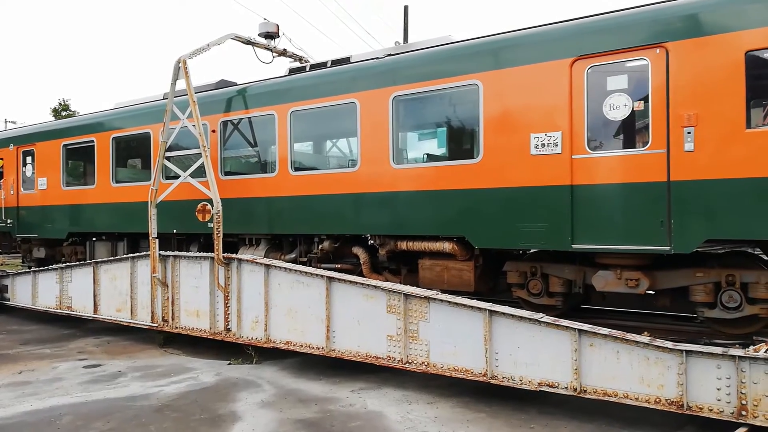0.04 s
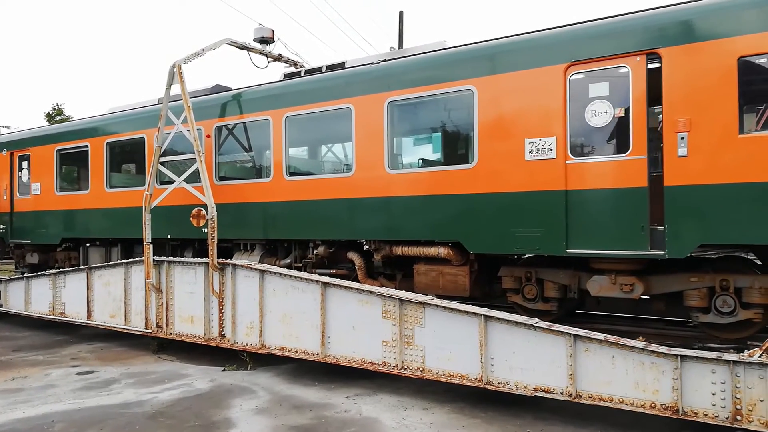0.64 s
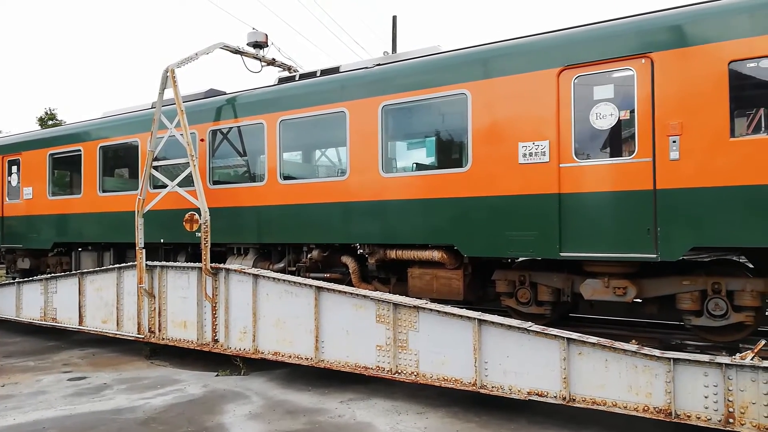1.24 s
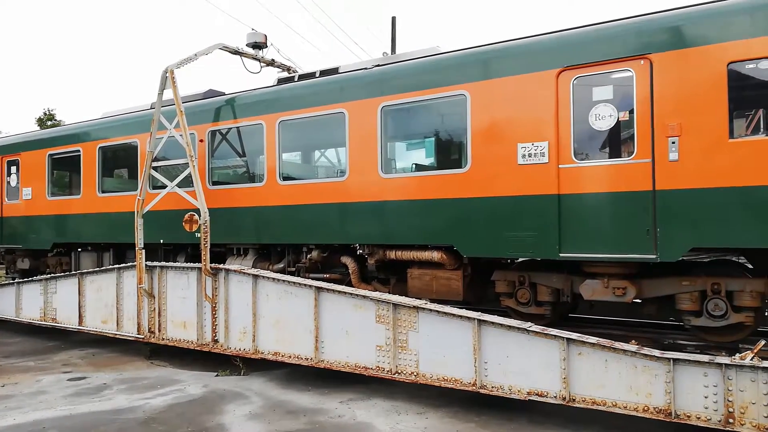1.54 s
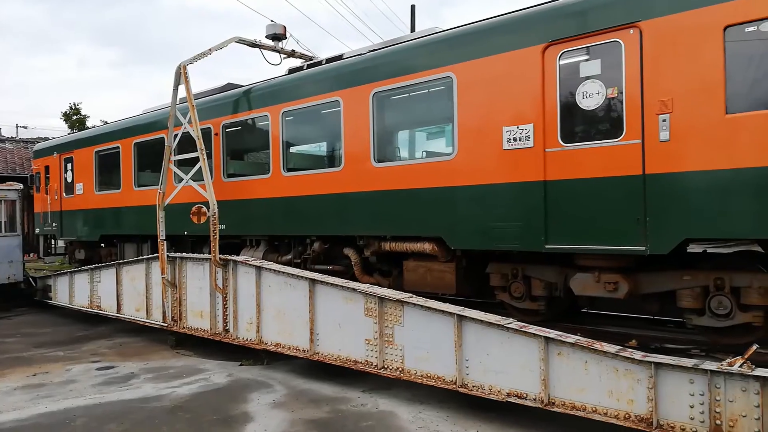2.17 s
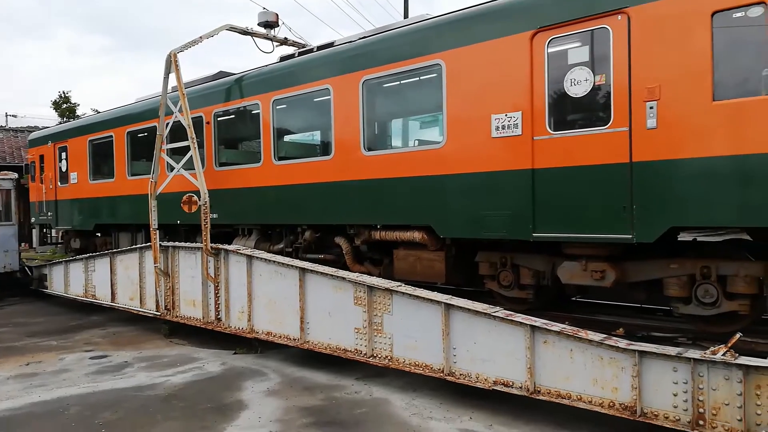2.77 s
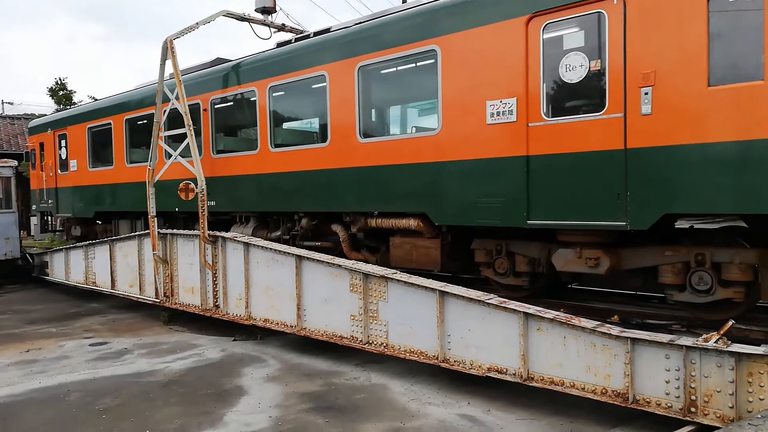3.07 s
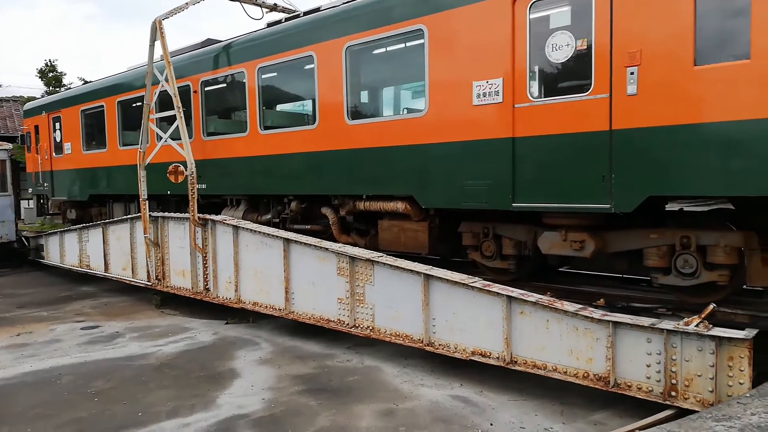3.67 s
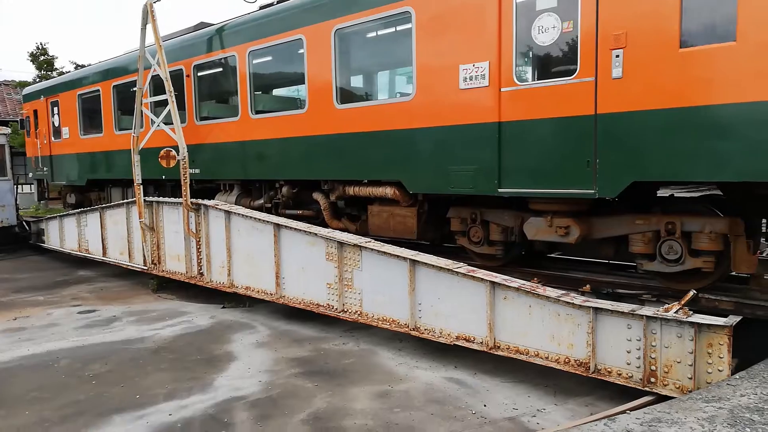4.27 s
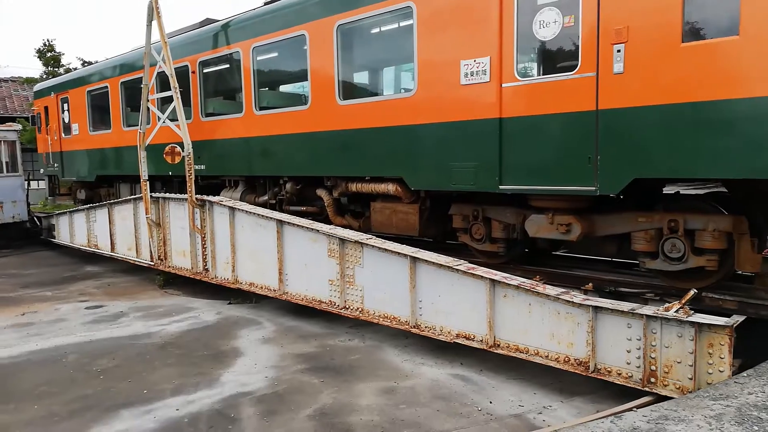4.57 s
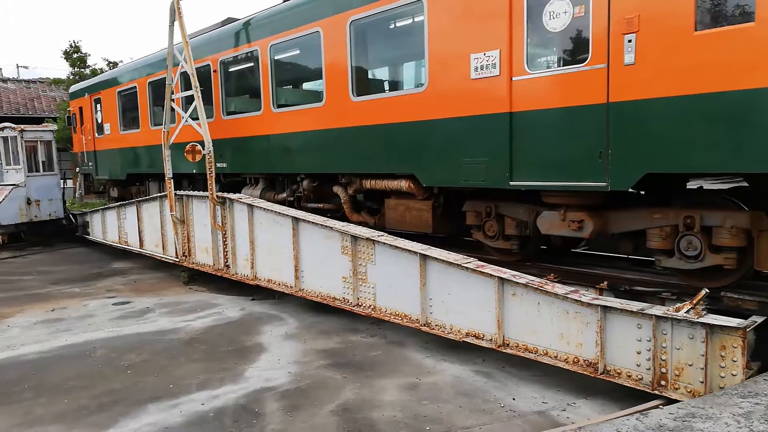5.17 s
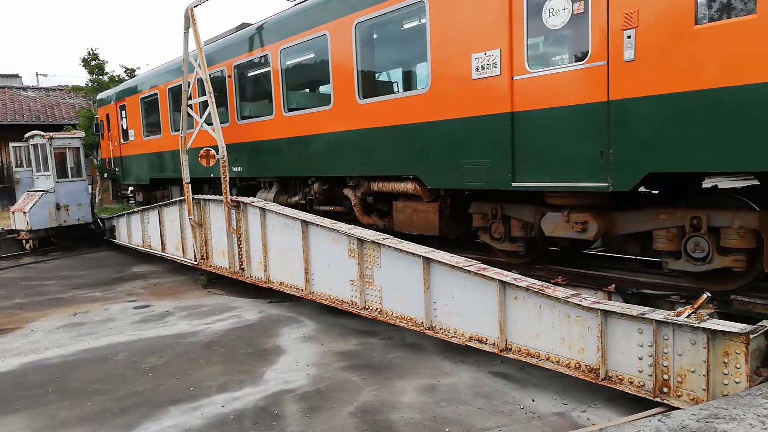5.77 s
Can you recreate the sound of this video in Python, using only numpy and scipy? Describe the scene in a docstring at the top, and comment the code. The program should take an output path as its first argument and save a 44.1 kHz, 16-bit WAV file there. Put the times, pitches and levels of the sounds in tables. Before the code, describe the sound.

A diesel railcar idles with a steady metallic clatter and low throb, broken by a brief silence, with a few light knocks.

```python
"""Diesel railcar idling

A six-cylinder diesel on a depot turntable, heard from two spots with a short silence between them.
Each firing knocks the block, rings its covers, ticks an injector and puffs from the exhaust;
the clatter repeats every six firings. Timing gears whine and a sliding door bumps shut.
At the second spot the listener walks along the car: a few hard knocks, two metal ticks, brief rasps."""
import sys
import numpy as np
from scipy import signal
from scipy.fft import rfft, irfft, next_fast_len
from scipy.io import wavfile
from scipy.ndimage import uniform_filter1d

SR = 44100
rng = np.random.default_rng(int(sys.argv[2]) if len(sys.argv) > 2 else 0)


def unload_audio(sound):
    """Save the sound as a 16-bit wav file, at the path given as the first command line argument."""
    columns = np.transpose(np.atleast_2d(sound))
    # keep every value between -1 and 1, then stretch to whole-number steps
    steps = np.round(np.clip(columns, -1, 1) * 32767)
    wavfile.write(sys.argv[1], SR, steps.astype(np.int16))


N = 265041
TIME = np.arange(N) / SR
EARS = np.array([[1], [-1]])  # left, right


def from_db(db):
    """Decibels to gain."""
    return 10 ** (np.asarray(db) / 20)


def unit_rms(x):
    """Scale to rms 1."""
    return x / np.sqrt(np.mean(x ** 2) + 1e-20)


def at_hz(points, hz):
    """Read a table on a log-frequency axis."""
    points = np.array(points)
    return np.interp(np.log(hz + 1), np.log(points[:, 0]), points[:, 1])


def drift(rate_hz):
    """Random wander through rate_hz points a second; rms 1."""
    knots = rng.standard_normal(4000)
    return unit_rms(np.interp(TIME * rate_hz, np.arange(len(knots)), knots))


def swell(centre_s, db, sigma_s):
    """Bell-shaped gain."""
    return from_db(db) * np.exp(-.5 * np.minimum(np.abs(TIME - centre_s) / sigma_s, 10) ** 2)


def surge(extra_db=4.3, hold_s=.22, release_s=.42):
    """Gain that jumps up on arrival at the second spot, holds, then sinks back to 1."""
    age = TIME - SPOTS[1][0]
    return from_db(extra_db * (age >= 0) * np.clip(1 - (age - hold_s) / release_s, 0, 1))


# Stereo width. Each row: frequency in Hz, left-right correlation.
EAR_CORRELATION = [(30, 1), (200, .95), (300, .83), (430, .1), (750, .6), (1000, .55), (1350, .93),
                   (1900, .28), (3000, .16), (5000, -.03), (10000, -.08), (14000, -.2)]
# Stereo balance. Each row: frequency in Hz, left minus right in dB.
EAR_BALANCE = [(300, 0), (700, -1), (1400, 0), (1850, -4.5), (2500, 0), (3400, 2), (4200, 2.5), (5100, 7),
               (6700, 4.5), (8000, 3), (9400, 5), (10400, 6), (11700, -1), (15000, 4)]

def colour(noise_pair, spectrum):
    """Shape two white noises into stereo with this spectrum, wider towards the treble; rms 1."""
    size = next_fast_len(N + 4096)
    hz = np.fft.rfftfreq(size, 1 / SR)
    mid, side = rfft(noise_pair, size)
    correlation = at_hz(EAR_CORRELATION, hz)
    stereo = np.sqrt(1 + correlation) * mid + EARS * np.sqrt(1 - correlation) * side
    low_hz, high_hz = spectrum[0][0] / 2, spectrum[-1][0] * 2
    rolloff = 1 / np.sqrt((1 + (hz / high_hz) ** 8) * (1 + (low_hz / (hz + 1)) ** 8))
    gain = rolloff * from_db(at_hz(spectrum, hz) + EARS * at_hz(EAR_BALANCE, hz) / 2)
    return unit_rms(irfft(gain * stereo, size)[:, :N])


def rattle(firings, firing_hz, spectrum, repeat, wander_rad_per_s=.32):
    """Dense ringing; the share `repeat` of its power recurs each engine cycle, slowly changing."""
    cycles = rng.standard_normal((2, 2, round(6 * SR / firing_hz)))
    one, other = np.take(cycles, (firings * SR / firing_hz).astype(int), axis=2, mode="wrap")
    pattern = one * np.cos(wander_rad_per_s * TIME) + other * np.sin(wander_rad_per_s * TIME)
    fresh = rng.standard_normal((2, N))
    return colour(np.sqrt(repeat) * pattern + np.sqrt(1 - repeat) * fresh, spectrum)


def blows(firings, cylinder_db, decay_s, slap, slap_s, steady, uneven_db=.6):
    """Envelope: each firing strikes and decays, the piston slaps after it, the valve gear never rests."""
    count = np.floor(firings).astype(int)
    onsets = np.flatnonzero(np.diff(count))
    hit_db = cylinder_db[count[onsets + 1] % len(cylinder_db)]
    hits = np.zeros(N)
    hits[onsets] = from_db(hit_db + uneven_db * rng.standard_normal(len(onsets))) ** 2
    power = signal.lfilter([1], [1, -np.exp(-2 / (decay_s * SR))], hits + 1e-18)
    power = uniform_filter1d(power + slap * np.interp(TIME - slap_s, TIME, power), size=60)
    return unit_rms(np.sqrt(np.abs(power + steady)))


# Cylinders in firing order, one list a spot. Each row: block, cover and injector strength in dB.
CYLINDERS = [
    [(-1, 3.5, -2.5), (-.5, 1.5, .5), (1.5, -2, 0), (0, -1.5, -1.5), (0, -2, 2.5), (1, 1, -1)],
    [(0, -1, -1.5), (2, 1.5, 3.5), (0, -1, -1.5), (1.5, 2.5, 0), (.5, -.5, 0), (0, -.5, 0)],
]
# Spectra of the struck parts. Each row: frequency in Hz, relative density in dB.
BLOCK_SPECTRUM = [(250, -39), (400, -9.5), (470, -13), (570, -8.5), (700, -7.5), (800, -4.5), (1030, -11.5),
                  (1170, -6), (1300, -2), (1450, -2.5), (1600, -8), (1900, -4.5), (3000, -31)]
COVER_SPECTRUM = [(1100, -8.5), (1460, -0.5), (1620, 0), (1770, 1), (1960, 2.5), (2200, 0.5), (2500, -4),
                  (2680, -5), (2900, -20), (4000, -31.5), (7000, -51)]
INJECTOR_SPECTRUM = [(1710, -33.5), (2900, -2), (3840, -3.5), (5150, -3), (7740, -11.5), (10300, -6),
                     (12500, -16), (15500, -31.5)]

def clatter(firings, firing_hz, spot, knock_db=(-30, -30.5)):
    """Combustion rings the block and its thin covers; the injectors tick above them."""
    block_db, cover_db, tick_db = np.transpose(CYLINDERS[spot])
    block = blows(firings, block_db, decay_s=.018, slap=.7, slap_s=.008, steady=.55)
    covers = blows(firings, cover_db, decay_s=.018, slap=.4, slap_s=.011, steady=.65)
    injectors = blows(firings, tick_db, decay_s=.015, slap=.3, slap_s=.003, steady=1.45, uneven_db=1)
    knock = from_db(knock_db[spot]) * block * rattle(firings, firing_hz, BLOCK_SPECTRUM, repeat=.6)
    ring = from_db(-31.5) * covers * rattle(firings, firing_hz, COVER_SPECTRUM, repeat=.6)
    ticks = from_db(-37.5) * injectors * rattle(firings, firing_hz, INJECTOR_SPECTRUM, repeat=.13)
    return surge() * (knock + ring) + surge(extra_db=5.3, hold_s=.18, release_s=.1) * ticks


# Three moments of the walk along the car, in seconds.
WALK_S = [2.4, 3.6, 5.1]

def ringing_parts(firings, parts, t60_s, rise_s, detune, scatter_turns, uneven_db):
    """Parts struck once a cycle, nearly alike each time. t60_s holds at 1500 Hz; higher dies sooner."""
    age = np.arange(SR // 8) / SR
    cycle_starts = np.arange(-12, 240, 6)
    out = np.zeros((2, N + len(age)))
    for lag, hz, *strengths_db in parts:
        force, pitch, slip = rng.standard_normal((3, len(cycle_starts)))
        onsets = np.searchsorted(firings, cycle_starts + lag)
        levels_db = np.interp(onsets / SR, WALK_S[:len(strengths_db)], strengths_db) + uneven_db * force
        turns = rng.random() + np.cumsum(scatter_turns * slip)
        ear_phase = np.arccos(at_hz(EAR_CORRELATION, hz)) * rng.choice([-1, 1]) * EARS / 2
        decay_db = -60 * age / t60_s * np.sqrt(hz / 1500)
        envelope = from_db(decay_db + EARS * at_hz(EAR_BALANCE, hz) / 2) * (1 - np.exp(-age / rise_s))
        for onset, db, turn, ring_hz in zip(onsets, levels_db, turns, hz * (1 + detune * pitch)):
            if 0 < onset < N:
                ring = np.sin(2 * np.pi * (ring_hz * age + turn) + ear_phase)
                out[:, onset:onset + len(age)] += from_db(db) * envelope * ring
    return out[:, :N]


# Cover and fuel pipe modes, one list a spot. Each row: lag after the first cylinder in firings,
# frequency in Hz, relative strength in dB (one value, or one for each moment of WALK_S).
COVER_MODES = [
    [(.28, 1770, 4.5), (.3, 1860, 1), (.55, 1670, -.5), (1.02, 1950, -4), (1.9, 1370, -4), (3.05, 1400, -5),
     (3.8, 1910, -3), (3.85, 1440, 1), (4, 1530, -5), (4.05, 1965, -2), (4.85, 1480, -3), (4.95, 1860, -2),
     (5, 1390, -4), (5.1, 1750, -1.5)],
    [(.1, 1425, -2, -2.5, -4), (.15, 1880, -9, -3, -6), (.25, 1295, -2.5, -3.5, -2), (1, 2000, 1, -6, -7),
     (1, 1440, -4, 1.5, -9), (1.1, 1475, -12, -8, 0), (1.1, 1590, -4.5, -6, -9), (1.05, 1770, -9, -7, -3),
     (2, 1455, -7, -3.5, -1), (1.95, 1560, -9, -3.5, -9), (2.1, 1940, -4, -8, -8), (2.1, 1780, -9, -6, -3),
     (3, 1640, -3, -3.5, -7), (3, 1760, 0, 0, -8), (3.05, 1795, -12, -7, 2.5), (3.05, 1405, .5, .5, -7),
     (3.15, 1300, -6, -3.5, -1), (1, 930, -5, -14, -14), (3, 1160, -4, -12, -14), (4, 1345, -5, -1, -3),
     (4.05, 1425, .5, -3, -3), (5.1, 1410, -1, -4.5, -6)],
]
FUEL_PIPE_MODES = [
    [(.2, 5250, -5), (1.04, 5150, 0), (1.04, 5600, -3), (1.96, 5200, 1), (2.9, 4220, -2), (3.05, 5500, -5),
     (3.98, 4650, -1.5), (4.02, 5080, 1), (4.98, 4850, -5)],
    [(0, 5050, -5), (1.07, 4220, -2), (1.07, 4860, .5), (1.07, 5320, 0), (2, 4700, -6), (2, 5250, -4),
     (3.03, 5200, -2), (4.04, 4830, -3), (4.04, 5300, -3), (4.12, 6600, -8), (5.02, 4900, -2),
     (5.02, 5270, 0)],
]

def clanks_and_pings(firings, spot, clank_db=(-25.6, -26.8), ping_db=-37.5):
    """Covers clank once a cycle; fuel pipes ping as their injector fires."""
    clanks = ringing_parts(firings, COVER_MODES[spot], t60_s=.15, rise_s=.003,
                           detune=.004, scatter_turns=.07, uneven_db=1)
    pings = ringing_parts(firings, FUEL_PIPE_MODES[spot], t60_s=.14, rise_s=.0015,
                          detune=.022, scatter_turns=.3, uneven_db=2)
    return surge() * (from_db(clank_db[spot]) * clanks + from_db(ping_db) * pings)


PUFF_LAG_FIRINGS = .35
# Exhaust pipe and underfloor spectra. Each row: frequency in Hz, relative density in dB.
EXHAUST_SPECTRUM = [(20, -20.5), (32, 0), (46, 2), (56, -8), (76, 5.5), (95, 1.5), (125, -2.5), (160, -8.5),
                    (260, -38.5)]
UNDERFLOOR_SPECTRUM = [(90, -4.5), (140, -3), (225, 2), (280, -3.5), (320, -1), (370, -6), (480, -11),
                       (800, -32.5)]
# Underfloor rumble, growing along the car. Each row: time in seconds, level before the surge in dB.
RUMBLE_LEVELS = [(0, -46.5), (1.5, -43.5), (2, -44), (3.2, -42), (4.2, -40.5), (5.2, -39), (6, -37.5)]

def exhaust(firings, firing_hz, fall_db_per_s=.85):
    """Puffs follow the knocks: a firing tone, a wavering boom, the uneven cylinders' throb, rumble."""
    phase = 2 * np.pi * (firings - PUFF_LAG_FIRINGS)
    tone = from_db(-38.8 - fall_db_per_s * TIME) * np.cos(phase)
    boom = from_db(-45.3 + 2.2 * drift(5)) * np.cos(3 * phase)
    throb = from_db(-54) * np.cos(4 / 3 * phase)
    pipe = from_db(-40) * rattle(firings, firing_hz, EXHAUST_SPECTRUM, repeat=.27)
    rumble_gain = from_db(np.interp(TIME, *np.transpose(RUMBLE_LEVELS)))
    rumble = rumble_gain * rattle(firings, firing_hz, UNDERFLOOR_SPECTRUM, repeat=.148)
    low_end = np.sqrt(2) * (tone + boom + throb) + pipe + rumble
    return surge(extra_db=4, hold_s=.25, release_s=.35) * low_end


def engine_tone(firings, order, roughness=1):
    """A wavering sine at `order` times the firing rate; high orders are rougher and wider; rms 1."""
    height = min(order / 20, 1)
    phase = 2 * np.pi * order * (firings - PUFF_LAG_FIRINGS) + .2 * EARS * height
    flutter_rad = height * (.2 * drift(30) + .16 * drift(120))
    waver_db = 1.7 * drift(12) + 1.6 * height * drift(70)
    return unit_rms(from_db(roughness * waver_db) * np.cos(phase + roughness * flutter_rad))


# Gear whine as the listener moves. Each row: time in seconds, level in dB.
WHINE_LEVELS = [(1.5, -60), (1.95, -42.5), (2.7, -50), (3.6, -47.5), (3.9, -42), (4.3, -41), (4.6, -48),
                (5.25, -55), (5.55, -40), (6, -39.5)]

def gear_whine(firings):
    """The timing gears sing one thin tone locked to the crank."""
    level_db = np.interp(TIME, *np.transpose(WHINE_LEVELS))
    return from_db(level_db) * engine_tone(firings, order=23, roughness=.6)


# Steady engine tones. Each row: multiple of the firing rate, level in dB.
STEADY_TONES = [(2, -52), (4, -53), (12, -57), (16, -56), (42, -53), (51.5, -51)]
# Passing tones. Each row: centre in seconds, top level in dB, sigma in seconds, firing rate multiple.
SWELLING_TONES = [(2.05, -49, .12, 6), (2.1, -43.5, .16, 4), (3.5, -48, .8, 6.5), (2.3, -41.5, .13, 42),
                  (3.6, -46, .7, 46), (3.9, -54, 1.2, 16), (4.2, -50, .2, 9.5), (4.5, -47, .12, 3),
                  (4.62, -42, .16, 5), (4.8, -50, .5, 51.5), (4.8, -53, .8, 10), (5.1, -46, .1, 3),
                  (5.45, -48, .2, 5), (5.5, -50, .3, 4), (5.55, -45, .25, 9.33), (5.72, -36, .12, 5.83),
                  (5.85, -41, .17, 6), (5.7, -38, .09, 3), (5.96, -37.5, .1, 3)]

def engine_hum(firings):
    """Tones locked to the crank: some steady, some swelling and fading as the listener moves."""
    hum = sum(from_db(db) * engine_tone(firings, order) for order, db in STEADY_TONES)
    for centre_s, db, sigma_s, order in SWELLING_TONES:
        hum += swell(centre_s, db, sigma_s) * engine_tone(firings, order)
    return hum


# Spectrum of the rolling door. Each row: frequency in Hz, relative density in dB.
DOOR_SPECTRUM = [(30, 0), (70, -5.5), (130, -7.5), (260, -10.5), (400, -20)]
# Door meeting its frame. Each row: start in seconds, gain in dB, ring in Hz, t60 in seconds.
DOOR_BUMPS = [(1.04, -25.5, 318, .22), (1.06, -25, 128, .2), (1.09, -34, 265, .25), (1.15, -25, 42, .18),
              (1.185, -33, 225, .15), (1.195, -27, 75, .28), (1.245, -31.5, 235, .33), (1.3, -26, 47, .15)]

def sliding_door(rise_s=.0078):
    """The door rumbles along its track; each soft bump sets one panel mode ringing."""
    out = swell(centre_s=1.22, db=-35, sigma_s=.12) * colour(rng.standard_normal((2, N)), DOOR_SPECTRUM)
    for start_s, db, hz, t60_s in DOOR_BUMPS:
        age = np.maximum(TIME - start_s, 0)
        envelope = from_db(db - 60 * age / t60_s) * (1 - np.exp(-age / rise_s))
        out += envelope * np.sin(2 * np.pi * hz * age)
    return out


# Harder firings. Each row: start in seconds, gain in dB, band centre in Hz.
HARD_KNOCKS = [(2.15, -22, 1650), (2.151, -31, 5600), (3.2585, -19.5, 1550), (3.3765, -27, 5050)]

def hard_knocks(rise_s=.0011, decay_s=.0058, band_ratio=1.2):
    """The odd firing hits harder: a noise burst around the pitch of the part it strikes."""
    out = np.zeros((2, N))
    for start_s, db, hz in HARD_KNOCKS:
        age = np.clip(TIME - start_s, 0, 1)
        band = signal.butter(2, [hz / band_ratio, hz * band_ratio], "band", fs=SR, output="sos")
        noise = rng.standard_normal(N) + rng.standard_normal((2, N))  # half shared by both ears
        ring = unit_rms(signal.sosfilt(band, noise))
        out += from_db(db) * (1 - np.exp(-age / rise_s)) * np.exp(-age / decay_s) * ring
    return out


# Small metal ticks. Each row: start in seconds, level before the band-pass in dB.
METAL_TICKS = [(4.772, -28.5), (4.973, -23.5)]

def metal_ticks(decay_s=.0025, band_hz=(3500, 13000)):
    """Very short, bright snaps of noise."""
    envelope = sum(from_db(db) * (TIME >= start_s) * np.exp(-np.abs(TIME - start_s) / decay_s)
                   for start_s, db in METAL_TICKS)
    band = signal.butter(2, band_hz, "band", fs=SR, output="sos")
    return signal.sosfilt(band, envelope * rng.standard_normal((2, N)))


# Rasp spectrum. Each row: frequency in Hz, relative density in dB.
RASP_SPECTRUM = [(1700, -31), (2200, 2), (2500, 7), (2800, -14), (3600, -30)]
# Bright rasps. Each row: centre in seconds, top level in dB, sigma in seconds.
RASPS = [(4.92, -36, .035), (5.038, -36, .04), (5.228, -33.5, .022)]

def rasps():
    """Brief swells of noise brighten the clatter."""
    return sum(swell(*row) for row in RASPS) * colour(rng.standard_normal((2, N)), RASP_SPECTRUM)


# Listening spots. Each row: start and end in seconds, firing rate in Hz,
# time of one firing of the first cylinder in seconds.
SPOTS = [(0, 1.494, 33.86, .0145), (1.9465, 6.02, 34.275, .0197)]

def scene(wander_firings=.002):
    """The idling engine from each spot in turn, with silence between."""
    out, crank, audible = np.zeros((2, N)), np.zeros(N), np.zeros(N)
    for spot, (start_s, end_s, firing_hz, first_s) in enumerate(SPOTS):
        here = (TIME >= start_s) & (TIME < end_s)
        # Crank position in firings; the governor holds the speed almost still.
        firings = firing_hz * (TIME - first_s) + wander_firings * drift(5)
        metal = clanks_and_pings(firings, spot)
        out += here * (clatter(firings, firing_hz, spot) + metal + exhaust(firings, firing_hz))
        crank += here * firings
        audible += here
    tones = gear_whine(crank) + engine_hum(crank)
    return out + audible * (tones + sliding_door() + metal_ticks() + hard_knocks() + rasps())


def record(dry, cutoff_hz=15750):
    """Steep low-pass on the top treble."""
    return signal.sosfilt(signal.ellip(10, .2, 80, cutoff_hz, fs=SR, output="sos"), dry)


dry = scene()
out = record(dry)
unload_audio(out)
```